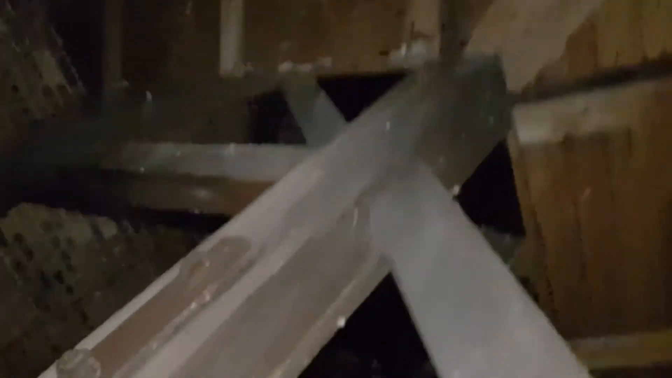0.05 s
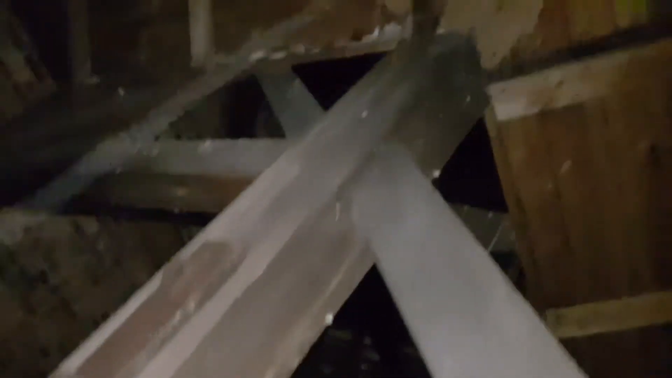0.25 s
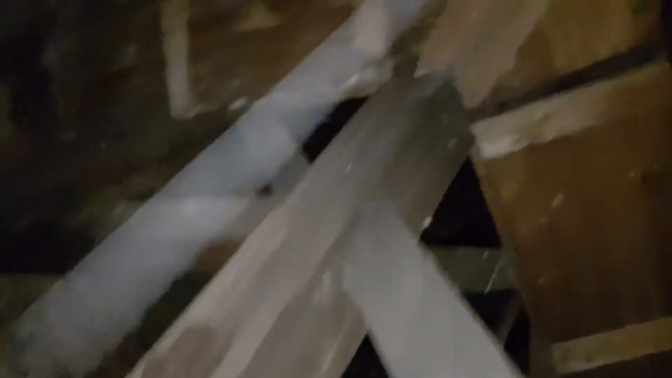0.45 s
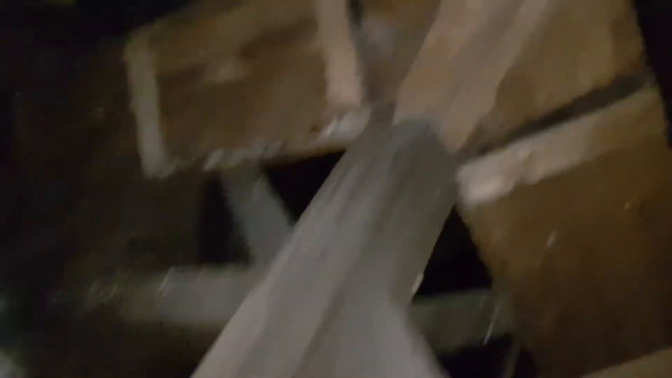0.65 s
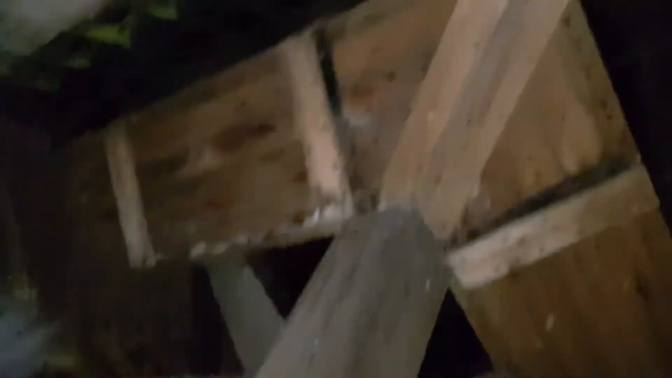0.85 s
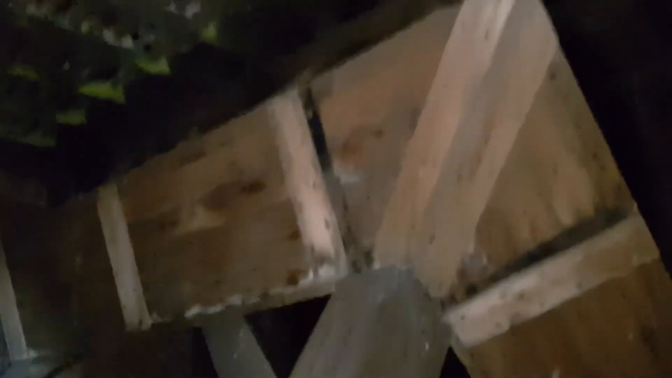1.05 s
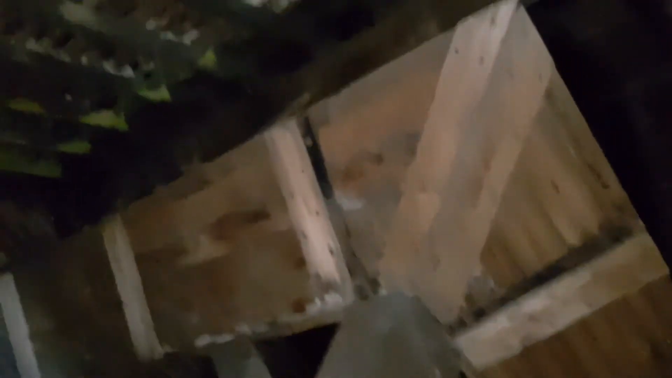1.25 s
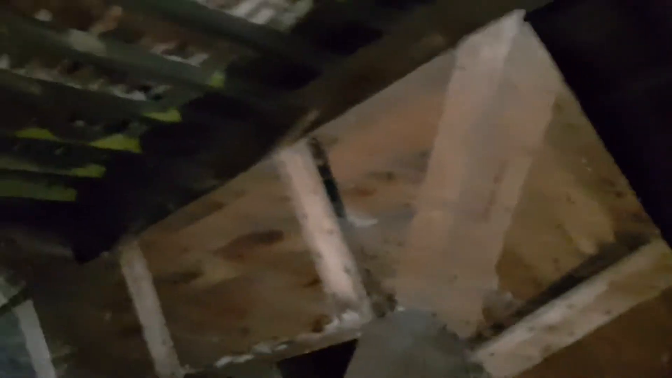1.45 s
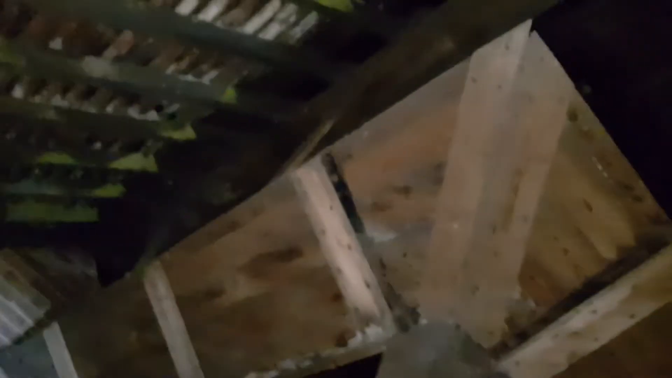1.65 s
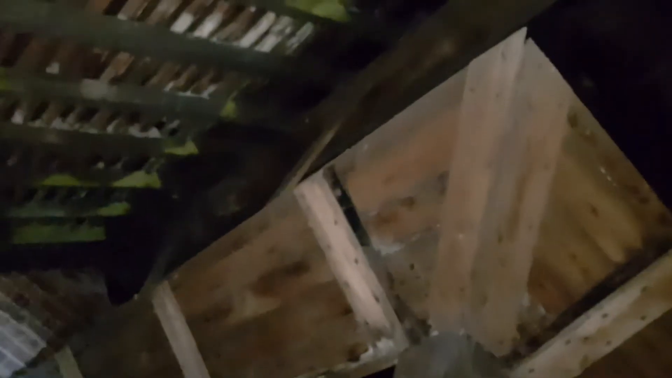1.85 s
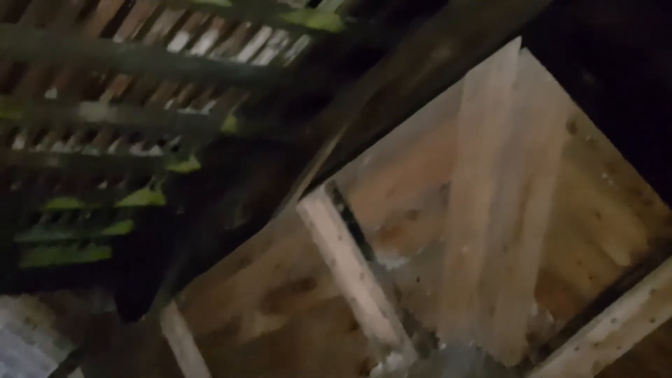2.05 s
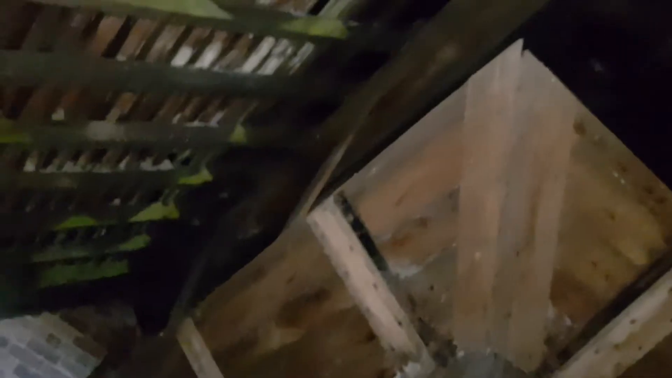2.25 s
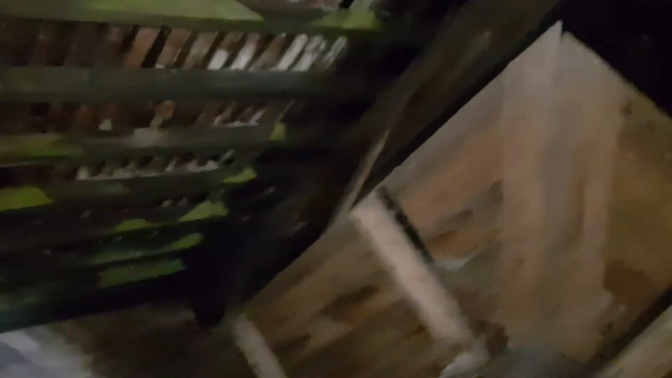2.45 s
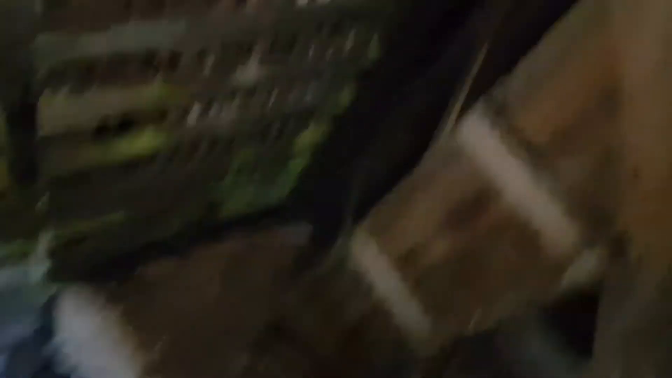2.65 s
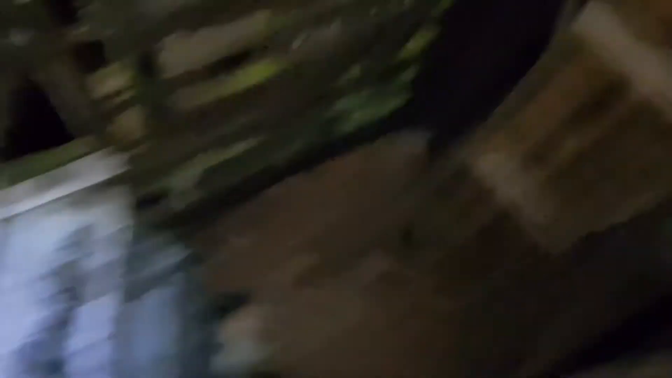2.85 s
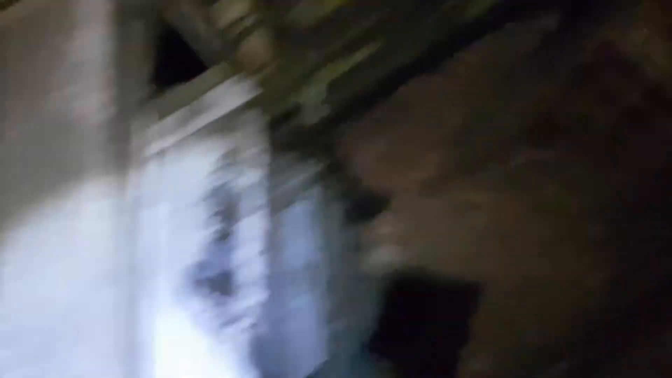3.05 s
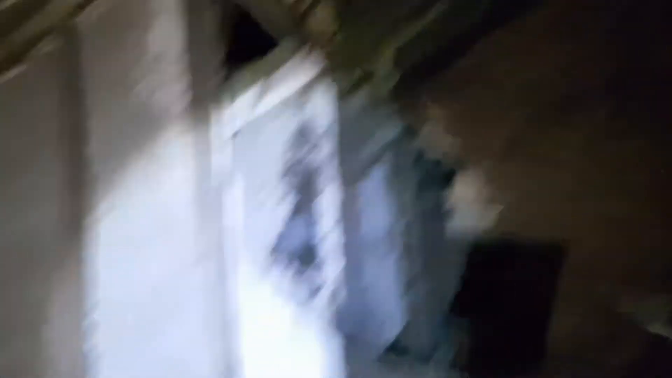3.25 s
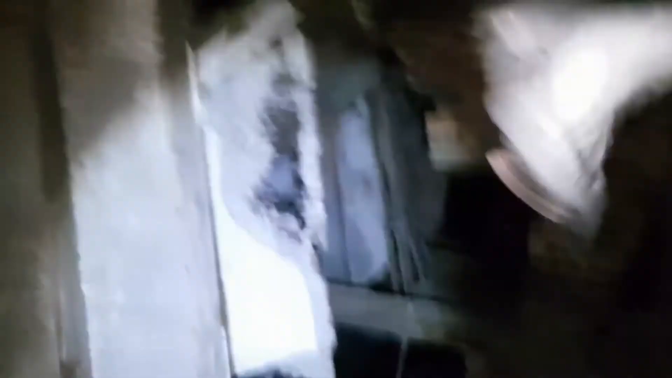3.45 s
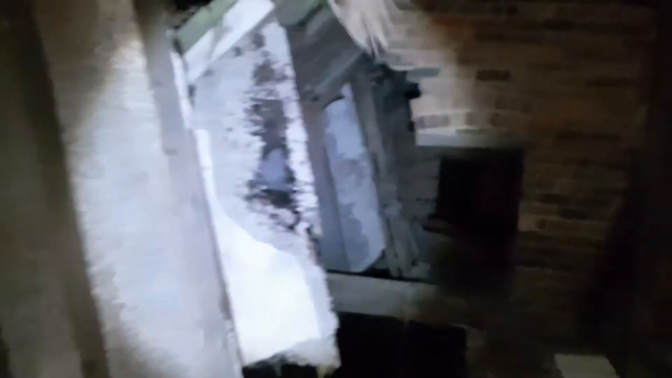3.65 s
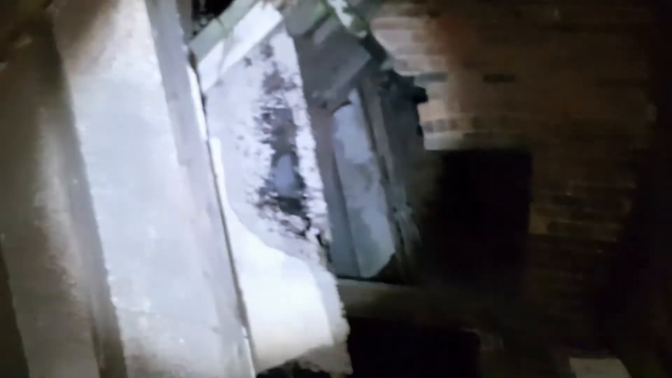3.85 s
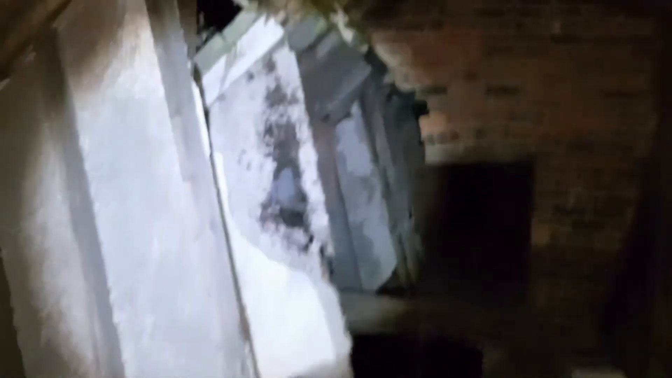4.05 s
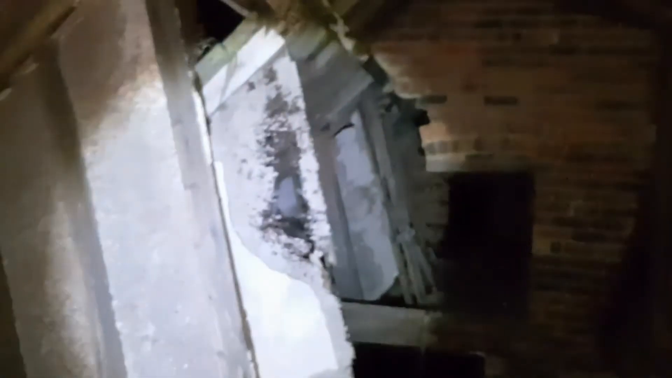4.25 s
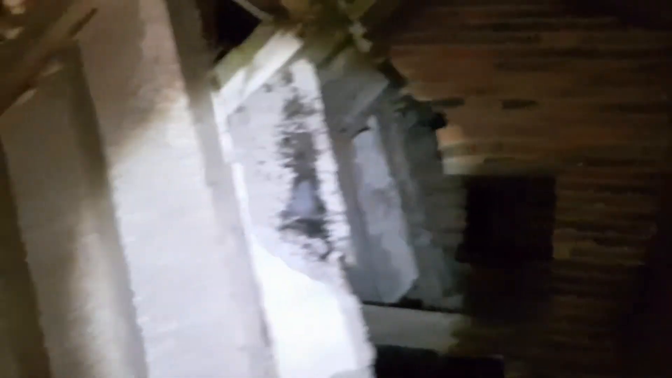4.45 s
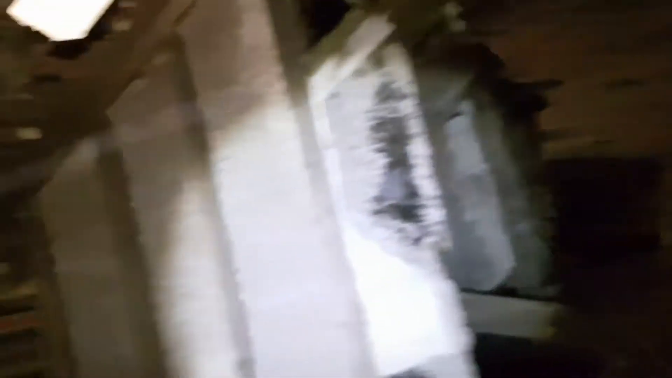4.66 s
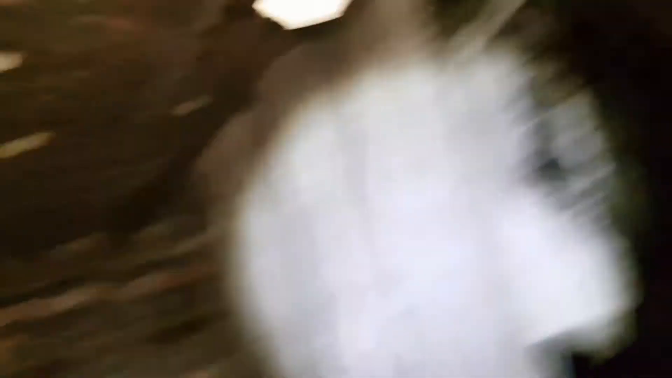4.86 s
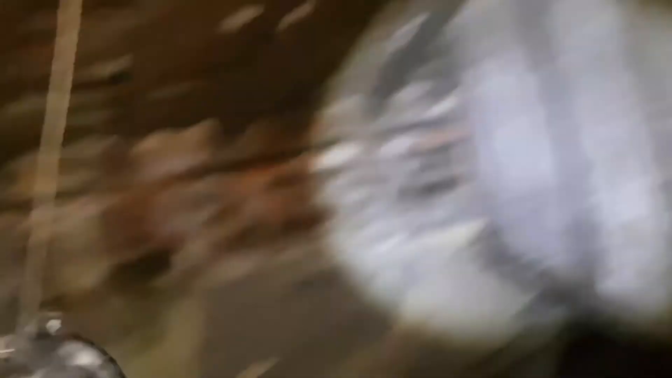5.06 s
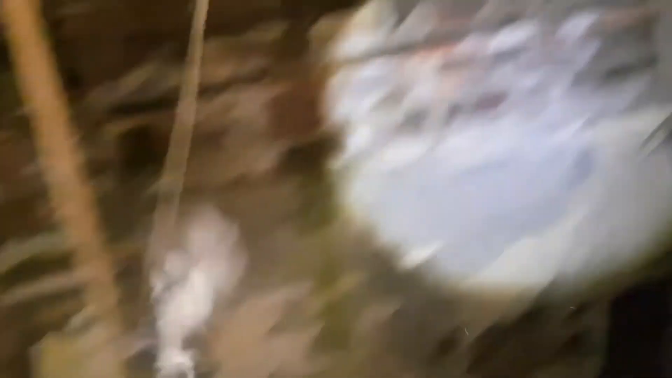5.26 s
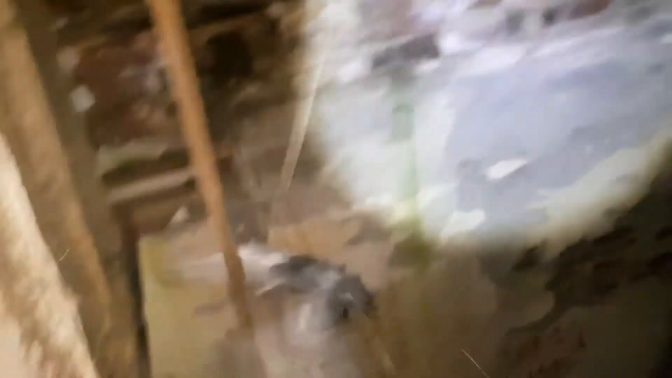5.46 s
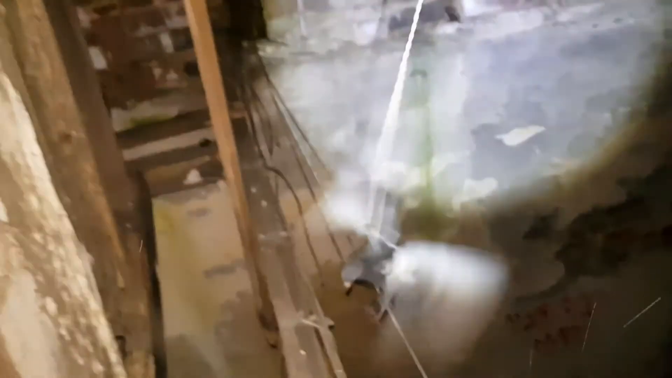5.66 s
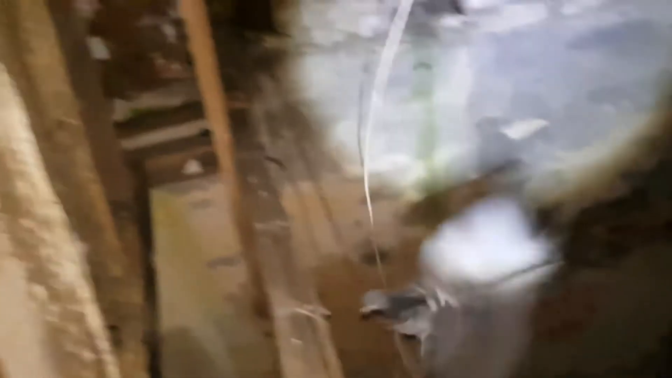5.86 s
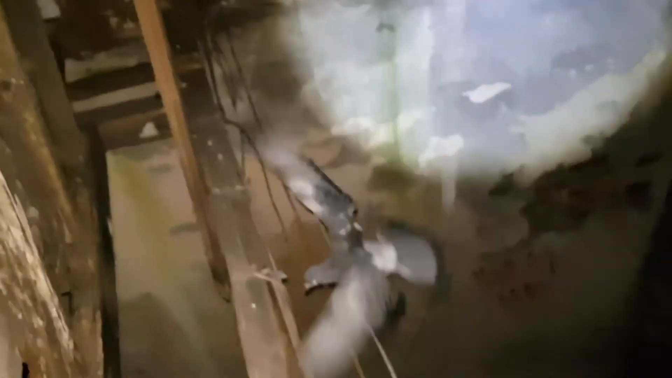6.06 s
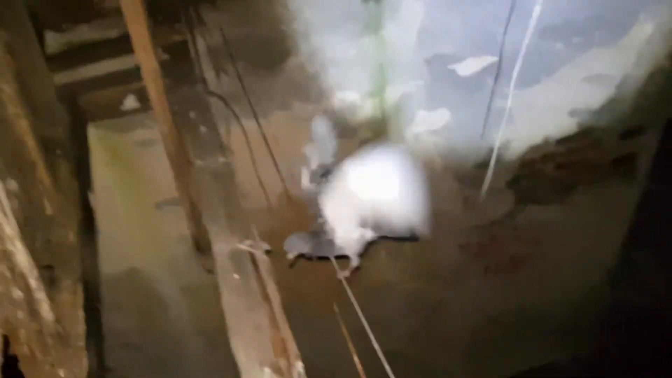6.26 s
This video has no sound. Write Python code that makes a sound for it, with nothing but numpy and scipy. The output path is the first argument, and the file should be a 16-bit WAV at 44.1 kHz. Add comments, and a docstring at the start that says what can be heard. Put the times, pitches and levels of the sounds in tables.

```python
"""Inside an old timber and brick loft a few small taps, pats and feather shuffles come before the flight.
Then a pigeon takes off and flutters close past the microphone, some seven or eight beats a second.
Downstrokes push low, sinking puffs of air, feathers slap in ragged bursts of noise and barb clicks, and
on some beats the wings clap with a tick and a pop. Partway through, the bird bumps into ringing timber.
Air swirls and feathers rustle between the slaps; draught and faint hiss lie underneath."""
import sys
import numpy as np
from scipy import signal
from scipy.fft import rfft, irfft, next_fast_len
from scipy.io import wavfile
from scipy.ndimage import uniform_filter1d

SR = 44100
rng = np.random.default_rng(int(sys.argv[2]) if len(sys.argv) > 2 else 0)


def put_to_file(sound):
    """Save the sound as 16-bit audio at rate SR, in the file named by the first command-line argument."""
    columns = np.atleast_2d(sound).T  # one column per channel
    safe = np.clip(columns, -1, 1)
    whole_steps = np.round(safe * 32767)
    wavfile.write(sys.argv[1], SR, whole_steps.astype(np.int16))


N = 278310
TIME = np.arange(N) / SR   # s

# Levels in the tables are relative; each layer sets its own balance.
# faint steady hiss of the place: [f/Hz, level/dB per Hz]
QUIET_SPECTRUM = [(59, -15), (100, -13), (174, -6), (239, -14), (389, -8), (558, -12.5), (721, -12.5),
                  (1170, -14), (1420, -14), (6150, -19.5), (16000, -15)]
QUIET_DB = -70
# draught and handling on the microphone: [t/s, level/dB]
DRAUGHT_LEVEL = [(0, -66.5), (.6, -66), (.95, -74.5), (2.77, -75.5), (2.85, -63), (4.8, -62), (5.35, -45),
                 (5.65, -54.5), (5.95, -53), (6.31, -64)]
# low wind of the draught: [f/Hz, level/dB per Hz]
RUMBLE_SPECTRUM = [(15, -5), (40, 1), (80, 1), (115, -4.5), (190, -28), (400, -39)]
# buffeting of a gust: [f/Hz, level/dB per Hz]
GUST_SPECTRUM = [(20, -21), (50, 2.5), (90, 5), (160, -2.5), (240, -11), (450, -42)]
# wind of each slap at the microphone, strongest as the bird passes: [t/s, level/dB]
DOWNWASH_LEVEL = [(3.0, -76), (3.8, -68), (4.13, -62), (4.56, -64), (4.75, -47), (4.88, -39.5),
                  (5.25, -37.5), (5.6, -46.5), (6.0, -44.5), (6.2, -64)]
GUST_LAG_S, GUST_WIDTH_S = 0.005, 0.022
GUST_FOLLOWS, USUAL_SLAP_DB = 0.11, -33   # gust dB per dB of slap above the usual slap
# soft low bumps of a hand on the microphone: [t/s, level/dB]
HANDLING_BUMPS = [(0.239, -51), (0.412, -56), (0.563, -62), (0.74, -57), (1.838, -54), (1.96, -42.5),
                  (2.829, -43)]
# ring of the microphone casing: [f/Hz, level/dB, t60/s]
CASING_MODES = [(65, -7, 0.091), (134, -10.5, 0.041), (345, -12, 0.044)]

# small hard taps close to the microphone: [t/s, level/dB]
HARD_TAPS = [(1.0714, -31), (1.2696, -27.5)]
# ring of a hard tap: [f/Hz, level/dB, t60/s]
HARD_TAP_MODES = [(61, -14, 0.092), (385, 3, 0.013), (1040, 3, 0.0038), (2110, 4, 0.0052),
                  (2500, -2.5, 0.0031), (3130, -5.5, 0.0052), (4330, -1.5, 0.0021), (8500, -5.5, 0.00094)]
# soft dull pats: [t/s, level/dB]
SOFT_PATS = [(.106, -50.5), (1.2015, -38.5), (1.4475, -36), (2.4945, -44), (2.8735, -30)]
# ring of a soft pat: [f/Hz, level/dB, t60/s]
SOFT_PAT_MODES = [(470, 1, 0.006), (860, 5.5, 0.002)]

# wings in motion: [t/s, stirred air level/dB, feather hiss level/dB]
FLUTTER_LEVELS = [(2.7, -88, -80), (2.84, -86, -62.5), (2.93, -61, -56.5), (3.03, -63, -58),
                  (3.33, -50.5, -51.5), (3.75, -61, -57), (3.95, -57, -56.5), (4.19, -45, -51),
                  (4.35, -64, -61), (4.375, -56.5, -50.5), (4.6, -50.5, -50.5), (4.98, -54, -50),
                  (5.33, -49.5, -54), (5.57, -52.5, -59), (5.77, -53, -49.5), (5.96, -44, -56),
                  (6.07, -62, -61), (6.31, -76, -69)]
# swirling air: [f/Hz, level/dB per Hz]
SWIRL_SPECTRUM = [(70, -6), (130, -9), (220, 1), (330, -3), (500, -4), (700, -14.5), (1000, -14.5)]
# rustle of the vanes: [f/Hz, level/dB per Hz]
RUSTLE_BODY_SPECTRUM = [(300, 1), (520, -1), (900, -3.5), (1500, -8), (2400, -12.5), (3800, -17)]
# rustle of the feather tips: [f/Hz, level/dB per Hz]
RUSTLE_HISS_SPECTRUM = [(1500, -21), (2600, -1.5), (4500, -1.5), (8500, -3.5), (13000, -5), (16000, -11)]
# crackle of loose feathers: [f/Hz, level/dB per Hz]
CRACKLE_SPECTRUM = [(500, 10.5), (1200, 0), (3000, 3), (7000, -13), (15000, -5)]
# the wings lift again after each slap, and air and rustle swell
UPSTROKE_LAG_S, UPSTROKE_WIDTH_S, UPSTROKE_DB = 0.07, 0.0061, 3.5

# the bird bumps into timber: [t/s, level/dB]
TIMBER_BUMPS = [(4.1311, -14.5), (4.137, -44)]
# ring of the timber: [f/Hz, level/dB, t60/s]
TIMBER_MODES = [(132, -18, .09), (298, -7.5, .035), (556, -7, 0.0089), (896, -0.5, 0.026),
                (1390, 6.5, 0.0028)]
# air pushed by a downstroke: [t/s at its height, level/dB, f/Hz around its height]
DOWNSTROKE_PUFFS = [(2.942, -33, 370.8), (3.059, -36.5, 302), (3.187, -36.5, 225.3), (3.32, -35, 392),
                    (3.42, -40, 293), (3.684, -38, 338.3), (3.801, -43.5, 335), (3.94, -38.5, 213.7),
                    (4.029, -36, 480), (4.067, -44, 400), (4.135, -28, 343), (4.469, -36.5, 328.9),
                    (4.868, -37.5, 275), (5.075, -36.5, 217), (5.132, -35.5, 234.6), (5.253, -29.5, 208.7),
                    (5.271, -45, 118.3), (5.476, -35.5, 223.4), (5.693, -33.5, 245.2),
                    (5.841, -38.5, 227.3), (5.918, -41, 272.5)]
# wings meet: [t/s, quill tick level/dB, trapped air pop level/dB]
WING_CLAPS = [(3.0688, -18.5, -51), (3.1466, -16.5, -30), (3.3216, -13.5, -26), (3.4482, -18, -25),
              (3.5648, -12.5, -22.5), (4.5638, 1.5, -0.5), (5.6297, -16, -52), (5.7772, -14, -24),
              (5.903, -0.5, -18), (5.9241, -17, -10.5)]
# tick of stiff quills: [f/Hz, level/dB, t60/s]
QUILL_MODES = [(3420, -10, 0.0017), (6400, -6, 0.0015), (11500, -6, 0.00086)]
# pop of trapped air: [f/Hz, level/dB, t60/s]
POP_MODES = [(530, -3, 0.0042), (1350, -5.5, 0.0035)]

# feathers slap or brush: [t/s, level/dB, brightness/dB, t60/s]
# brightness above 0 gives more barb sizzle, below 0 more vane thwack
FEATHER_SLAPS = [(2.835, -56, 3.5, 0.75), (2.935, -52.5, -0.5, 0.37), (3.069, -41, -1, 0.1),
                 (3.202, -42.5, -3, .06), (3.32, -39.5, -1.5, .09), (3.443, -40, -6, 0.093),
                 (3.5622, -31.5, -2, 0.078), (3.686, -49, -3, 0.21), (3.812, -49, -4.5, 0.12),
                 (3.994, -46.5, -10, 0.15), (4.016, -42.5, -2, 0.14), (4.1233, -41.5, -8.5, 0.057),
                 (4.131, -38, -11, 0.12), (4.4128, -39.5, -3.5, 0.13), (4.497, -45.5, -5, 0.042),
                 (4.5567, -35, -5.5, 0.097), (4.5648, -27.5, 4, 0.033), (4.743, -16.5, 1.5, 0.043),
                 (4.878, -32.5, -1, 0.069), (5.007, -35.5, -1, 0.085), (5.144, -42, 1, .14),
                 (5.271, -33, -2, .05), (5.29, -44.5, -5, 0.18), (5.466, -39.5, 1.5, 0.14),
                 (5.56, -47, -2.5, 0.092), (5.608, -46, 6, 0.14), (5.629, -38.5, 4, 0.065),
                 (5.744, -35, 1.5, .2), (5.773, -26.5, 3, 0.069), (5.903, -20, 2.5, .078),
                 (5.922, -29, 5.5, 0.082), (5.994, -35, 3.5, 0.07), (6.193, -45.5, -4, 0.23)]
SLAP_RISE_S = 0.0012
TOUCH_LEAD_S, TOUCH_DB = 0.0033, -17.5   # the wing tips touch just before the slap
# the perched bird shuffles its feathers: [t/s, level/dB]
FEATHER_SHUFFLES = [(1.841, -58.5), (1.957, -58), (2.251, -55.5), (2.365, -55), (2.499, -50)]
SHUFFLE_RISE_S, SHUFFLE_T60_S, SHUFFLE_BRIGHT_DB = 0.0038, 0.046, 2.5
# thwack of the vanes: [f/Hz, level/dB per Hz]
SLAP_BODY_SPECTRUM = [(100, -7.5), (250, -6.5), (500, -1), (1100, -5), (1700, -6.5), (2500, -11.5),
                      (4000, -28)]
# hiss of the barbs: [f/Hz, level/dB per Hz]
SLAP_HISS_SPECTRUM = [(1400, -14), (2400, -1.5), (3500, 0), (4700, -0.5), (7000, -5), (8800, -11)]
# sizzle of the barbs: [f/Hz, level/dB per Hz]
SLAP_SIZZLE_SPECTRUM = [(6000, -17), (7500, 0.5), (9000, -3.5), (11000, -1), (14000, -3), (16000, -9)]

# decay of the loft's echo: [f/Hz, t60/s]
ECHO_T60 = [(150, 0.47), (400, 0.14), (1000, 0.29), (3000, 0.22), (7000, 0.37), (15000, 0.094)]
# strength of the loft's echo: [f/Hz, level/dB]
ECHO_LEVEL = [(150, -4.5), (500, -16.5), (1500, -12.5), (4000, -14.5), (8000, -22.5), (14000, -17)]
# reflections from nearby beams: [delay/s, gain]
BEAM_REFLECTIONS = [(.0028, -0.0057), (.0037, -0.047), (.0071, .1)]
CUTOFF_HZ = 16000


def from_db(db):
    """Decibels to gain."""
    return np.exp(np.asarray(db) * (np.log(10) / 20))


def rms_one(x):
    """Scale to unit power."""
    return x / np.sqrt(np.mean(x ** 2) + 1e-20)


def dying(age, t60):
    """Exponential decay, down 60 dB after t60 seconds."""
    return np.exp(-np.log(1000) * age / t60)


def add(track, s, sound):
    """Mix a sound into the track at time s."""
    start = max(round(s * SR), 0)
    track[start:start + len(sound)] += sound[:N - start]


def filtered(x, order, edge_hz, kind="low"):
    """Smooth-edged low-pass or band-pass filter."""
    return signal.sosfilt(signal.butter(order, edge_hz, kind, fs=SR, output="sos"), x)


def gains_in_time(rows):
    """One gain curve for each dB column, silent before the first row."""
    s, *columns = np.transpose(rows)
    return [from_db(np.interp(TIME, s, c)) * (TIME >= s[0]) for c in columns]


def swells(rows, width):
    """A smooth bump at each (s, height); where two overlap the higher one counts."""
    s, height = np.transpose(rows)
    coarse = np.linspace(0, N / SR, N // 100)
    bumps = height * np.exp(-((coarse[:, None] - s) / width) ** 2 / 2)
    return np.interp(TIME, coarse, bumps.max(axis=1))


def flicker(per_s, depth_db):
    """A gain that wanders at random, per_s times a second."""
    knots = rng.standard_normal(N // 100)
    wander = np.interp(TIME * per_s, np.arange(len(knots)), np.clip(knots, -2, 2))
    return from_db(depth_db * wander)


def at_hz(points, hz):
    """Read a table on a log-frequency axis."""
    f, value = np.transpose(points)
    return np.interp(np.log(hz + 1e-9), np.log(f), value)


def coloured(x, spectrum):
    """Give x a spectrum that falls away beyond its ends; rms 1."""
    size = next_fast_len(N, real=True)
    hz = np.fft.rfftfreq(size, 1 / SR)
    low_skirt = np.minimum(hz / spectrum[0][0], 1)
    high_skirt = np.minimum(spectrum[-1][0] / (hz + 1), 1)
    gain = from_db(at_hz(spectrum, hz)) * (low_skirt * high_skirt) ** 2
    return rms_one(irfft(rfft(x, size) * gain, size)[:N])


def noise(spectrum):
    """Smooth noise of a given colour."""
    return coloured(rng.standard_normal(N), spectrum)


def barbs(spectrum, per_s, spread_db, smooth):
    """Feather barbs flick over each other: tiny clicks of uneven size on a smooth hiss."""
    sizes = from_db(spread_db * np.minimum(rng.exponential(1, N), np.pi))
    signs = rng.choice([-1, 1], N)
    clicks = rms_one(sizes * signs * (rng.random(N) < per_s / SR))
    return coloured(clicks + smooth * rng.standard_normal(N), spectrum)


def struck(modes, swell=1e-6):
    """The ring of an object after one blow; each mode builds up over `swell` of its cycles."""
    age = TIME[:SR // 4]
    ring = np.zeros(len(age))
    for k, (hz, db, t60) in enumerate(modes):
        build_up = 1 - np.exp(-age * hz / swell)
        mode = from_db(db) * np.sin(2 * np.pi * hz * age) * dying(age, t60) * build_up
        ring += (-1) ** k * mode   # neighbouring modes start in opposite directions
    return ring


def blows(rows, modes, swell):
    """One object struck at each (s, dB)."""
    out = np.zeros(N)
    for s, db in rows:
        add(out, s, from_db(db) * struck(modes, swell))
    return out


def loft(x, build_up):
    """Direct sound, reflections off the beams, and a diffuse tail with its own decay in each band."""
    age = TIME[:SR * 3 // 4]
    edges = np.geomspace(60, 17000, 11)   # Hz
    response = np.zeros(len(age))
    for low, high in zip(edges, edges[1:]):
        hz = np.sqrt(low * high)
        band = filtered(rng.standard_normal(len(age)), 2, [low, high], "band")
        tail = band * dying(age, at_hz(ECHO_T60, hz)) * (1 - np.exp(-age / build_up))
        bandwidth_gain = np.sqrt(2 * (high - low) / SR / len(age))
        response += from_db(at_hz(ECHO_LEVEL, hz)) * rms_one(tail) * bandwidth_gain
    for delay, gain in BEAM_REFLECTIONS:
        response[round(delay * SR)] += gain
    return x + signal.fftconvolve(x, response)[:N]


def quiet():
    """Faint steady hiss: coloured noise at a constant level."""
    return from_db(QUIET_DB) * noise(QUIET_SPECTRUM)


def draught(steady_db, gusts_db):
    """Low wind on the microphone: a steady draught, and a gust just after each slap."""
    level, = gains_in_time(DRAUGHT_LEVEL)
    steady = from_db(steady_db) * level * noise(RUMBLE_SPECTRUM)
    s, db, _, _ = np.transpose(FEATHER_SLAPS)
    downwash_db = np.interp(s, *np.transpose(DOWNWASH_LEVEL))
    strength = from_db(downwash_db + GUST_FOLLOWS * (db - USUAL_SLAP_DB))
    swell = swells(np.column_stack([s + GUST_LAG_S, strength]), GUST_WIDTH_S)
    gusts = from_db(gusts_db) * swell * noise(GUST_SPECTRUM)
    return (steady + gusts) * flicker(per_s=25, depth_db=1.5)


def handling():
    """A hand bumps the microphone and the low modes of its casing ring."""
    return blows(HANDLING_BUMPS, CASING_MODES, swell=0.16)


def taps(tap_edge_hz, pat_edge_hz):
    """Short dry taps and pats; the softer the contact, the lower its upper edge."""
    # the tiny offset keeps the filters clear of vanishingly small numbers
    hard = filtered(blows(HARD_TAPS, HARD_TAP_MODES, swell=0.91) + 1e-18, 2, tap_edge_hz)
    soft = filtered(blows(SOFT_PATS, SOFT_PAT_MODES, swell=0.23) + 1e-18, 4, pat_edge_hz)
    return hard + soft


def tap_echo(level_db, low_hz, high_hz):
    """The click of each tap's contact spreads into the loft and comes back as a faint wash."""
    clicks = np.zeros(N)
    for s, db in HARD_TAPS:
        add(clicks, s, from_db([db + level_db]))   # one sample long
    radiated = filtered(clicks + 1e-18, 2, [low_hz, high_hz], "band")
    return loft(radiated, build_up=0.021) - radiated   # the echo alone


def flutter(swirl_db, body_db, hiss_db, crackle_db):
    """Between the slaps air swirls and feathers rustle and crackle in uneven spurts, most on the upstroke."""
    swirl, hiss = gains_in_time(FLUTTER_LEVELS)
    upstroke = swells([(s + UPSTROKE_LAG_S, 1) for s, *_ in FEATHER_SLAPS], UPSTROKE_WIDTH_S)
    eddies = from_db(swirl_db) * swirl * noise(SWIRL_SPECTRUM) * flicker(per_s=76, depth_db=4.0)
    vanes = barbs(RUSTLE_BODY_SPECTRUM, per_s=400, spread_db=3, smooth=.9)
    tips = barbs(RUSTLE_HISS_SPECTRUM, per_s=1500, spread_db=2.5, smooth=1.3)
    loose = barbs(CRACKLE_SPECTRUM, per_s=90, spread_db=3, smooth=0)
    # the vanes sit midway in level between the stirred air and the hiss
    rustle = from_db(body_db) * np.sqrt(swirl * hiss) * vanes
    rustle += hiss * (from_db(hiss_db) * tips + from_db(crackle_db) * loose)
    return from_db(UPSTROKE_DB * upstroke) * (eddies + rustle * flicker(per_s=90, depth_db=2.5))


def timber_bump():
    """The bird's body hits timber, which rings in a few short, quickly damped modes."""
    return blows(TIMBER_BUMPS, TIMBER_MODES, swell=0.17)


def puffs(level_db, rise, fall, glide, wander, ripple, wake_db, wake_spread):
    """A vortex leaves the wing: low cycles that sink in pitch as it widens, in a longer turbulent wake."""
    vortex, wake = np.zeros(N), np.zeros(N)
    lead = 1 / 10   # s of sound before the height of the puff
    age = TIME[:SR // 4] - lead
    stage = age / np.where(age < 0, rise, fall)
    for s, db, hz in DOWNSTROKE_PUFFS:
        eddies = rms_one(uniform_filter1d(rng.standard_normal((2, len(age))), size=130))
        pitch = hz * np.exp(-glide * age + wander * eddies[0])
        phase = 2 * np.pi * (np.cumsum(pitch) / SR + rng.random())
        wave = np.sin(phase) + ripple * eddies[1] * np.sin(1.5 * phase)   # smaller eddies spin faster
        add(vortex, s - lead, from_db(db + level_db) / np.cosh(stage) * wave)
        add(wake, s - lead, from_db(db + wake_db) / np.cosh(stage / wake_spread))
    return vortex + wake * noise(SWIRL_SPECTRUM)


def claps(crack_db, crack_t60):
    """Quills meet with a sharp tick and a short crack, and the air between the wings pops out."""
    out, age = np.zeros(N), TIME[:SR // 50]
    for s, tick_db, pop_db in WING_CLAPS:
        add(out, s, from_db(tick_db) * struck(QUILL_MODES))
        add(out, s, from_db(pop_db) * struck(POP_MODES))
        crack = rng.standard_normal(len(age)) * dying(age, crack_t60)
        add(out, s, from_db(tick_db + crack_db) * crack)
    return out


def strokes():
    """Every slap and shuffle as (s, dB, brightness dB, rise s, t60 s)."""
    flying = [(s, db, bright, SLAP_RISE_S, t60) for s, db, bright, t60 in FEATHER_SLAPS]
    perched = [(s, db, SHUFFLE_BRIGHT_DB, SHUFFLE_RISE_S, SHUFFLE_T60_S) for s, db in FEATHER_SHUFFLES]
    return flying + perched


def slaps(body_db, hiss_db, sizzle_db):
    """Vanes thwack, barbs hiss: a light touch, a quick rise, then a decay as the feathers slide apart."""
    body, hiss, sizzle = np.zeros(N), np.zeros(N), np.zeros(N)
    age = TIME[:SR // 4] - TOUCH_LEAD_S
    for s, db, bright_db, rise, t60 in strokes():
        attack = np.clip(age / rise, from_db(TOUCH_DB), 1)
        shape = from_db(db) * attack * dying(np.maximum(age - rise, 0), t60)
        add(body, s - TOUCH_LEAD_S, from_db(body_db - bright_db) * shape)
        add(hiss, s - TOUCH_LEAD_S, from_db(hiss_db) * shape)
        add(sizzle, s - TOUCH_LEAD_S, from_db(sizzle_db + bright_db) * shape)
    feathers = body * barbs(SLAP_BODY_SPECTRUM, per_s=4000, spread_db=3.0, smooth=0.78)
    feathers += hiss * barbs(SLAP_HISS_SPECTRUM, per_s=5800, spread_db=2.5, smooth=1.0)
    feathers += sizzle * barbs(SLAP_SIZZLE_SPECTRUM, per_s=6000, spread_db=7.5, smooth=0.36)
    # the flight feathers land one after another, so every slap is ragged
    return flicker(per_s=450, depth_db=3.0) * feathers


def scene():
    """The bird in the loft, with taps, handling, draught and faint hiss at the microphone."""
    rumble = draught(steady_db=-1.5, gusts_db=-1.5) + handling()
    near = taps(tap_edge_hz=11000, pat_edge_hz=1350)
    near += tap_echo(level_db=14.5, low_hz=1200, high_hz=4530)
    rustle = flutter(swirl_db=-1.5, body_db=-3.0, hiss_db=-2.93, crackle_db=-7.5)
    air = puffs(level_db=-0.5, rise=0.0054, fall=0.0079, glide=6, wander=0.126, ripple=0.33,
                wake_db=-9, wake_spread=1.5)
    wings = slaps(body_db=-1.0, hiss_db=-1.5, sizzle_db=-4.5) + claps(crack_db=-14, crack_t60=0.0022)
    bird = loft(wings + air + timber_bump(), build_up=0.02) + rustle   # the rustle stays dry
    return (quiet() + rumble + near + bird)[None]


def record(dry):
    """The top is cut steeply."""
    return signal.sosfilt(signal.ellip(10, .2, 70, CUTOFF_HZ, fs=SR, output="sos"), dry)


dry = scene()
out = record(dry)
put_to_file(out)
```